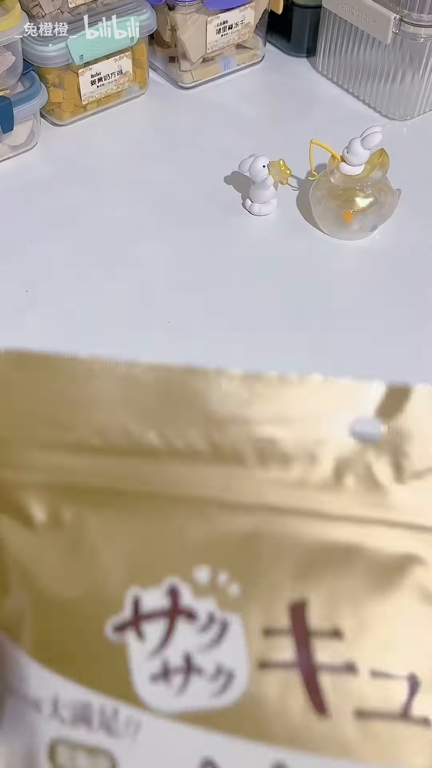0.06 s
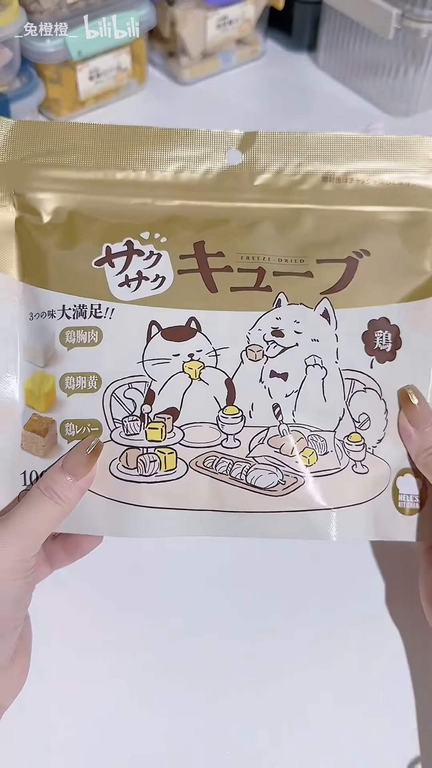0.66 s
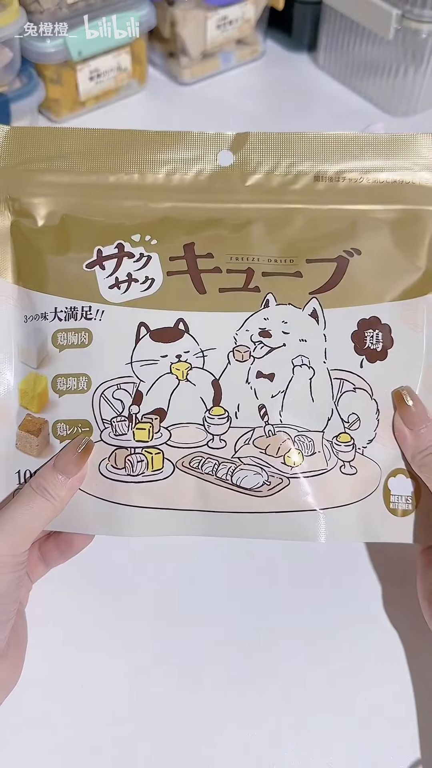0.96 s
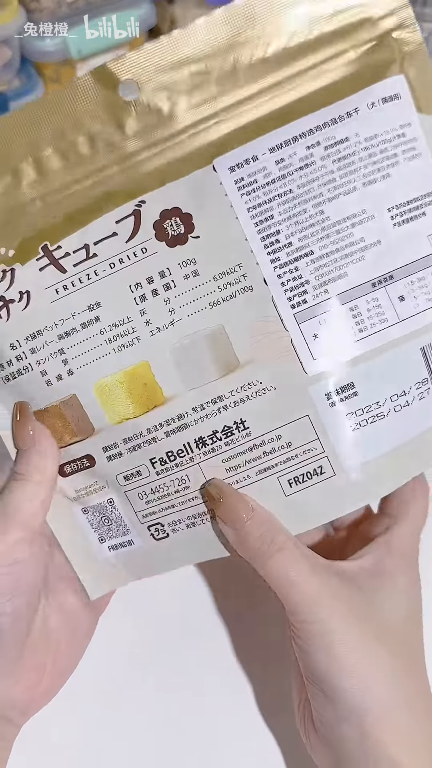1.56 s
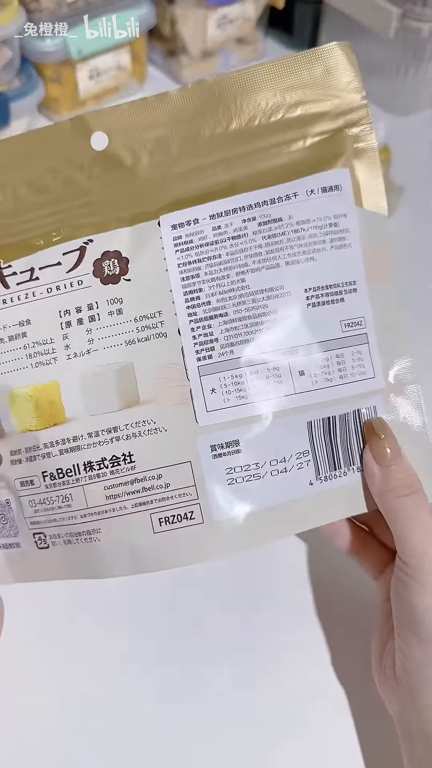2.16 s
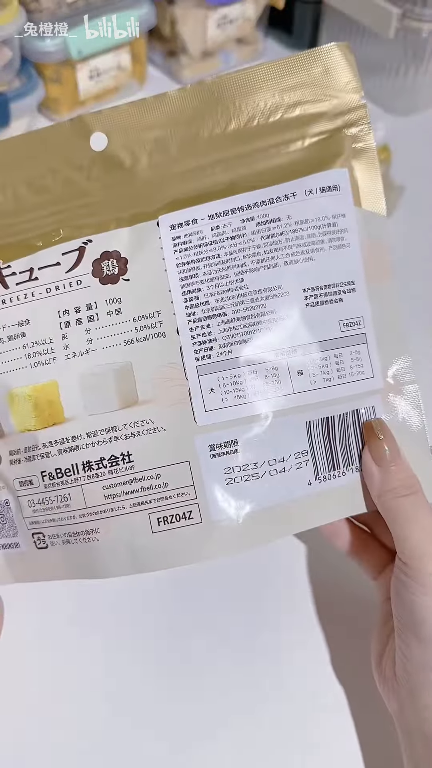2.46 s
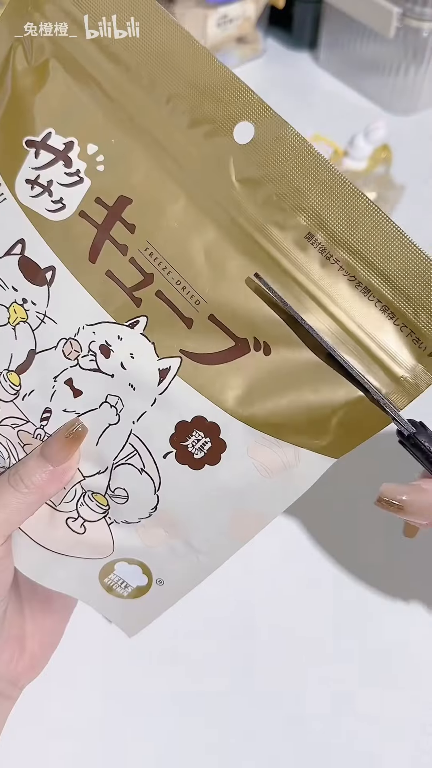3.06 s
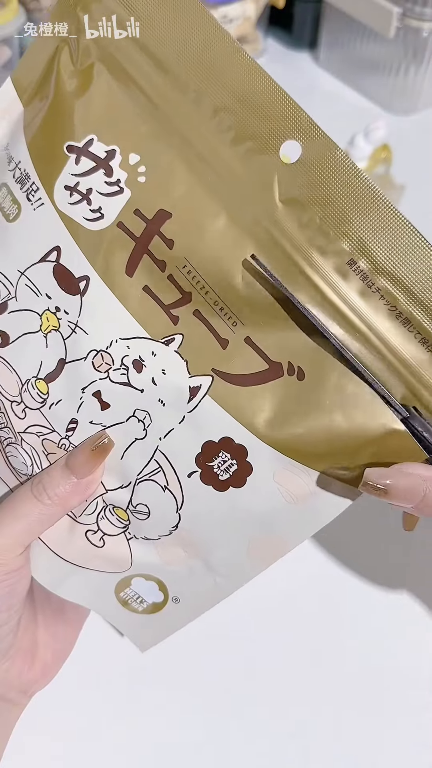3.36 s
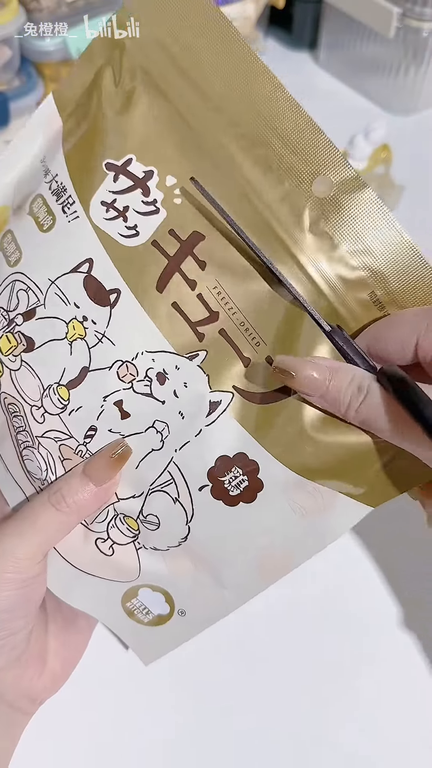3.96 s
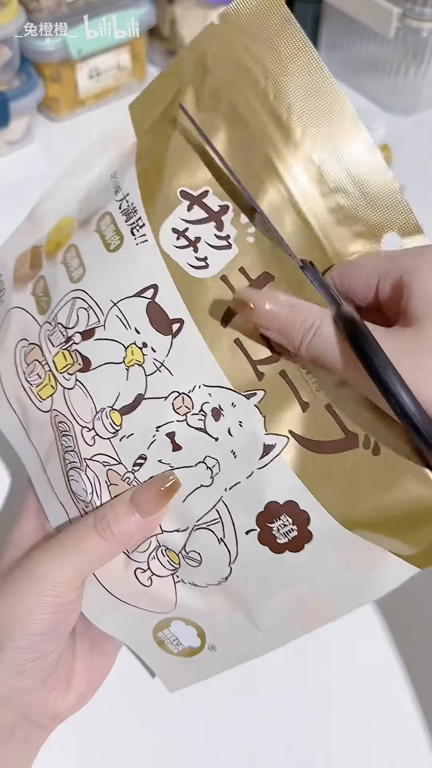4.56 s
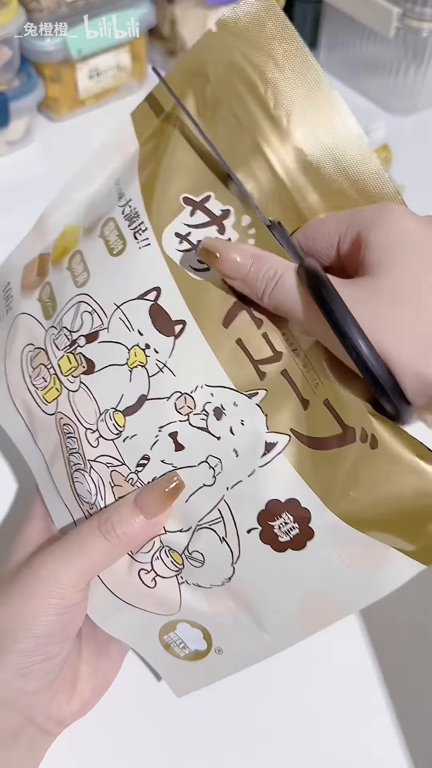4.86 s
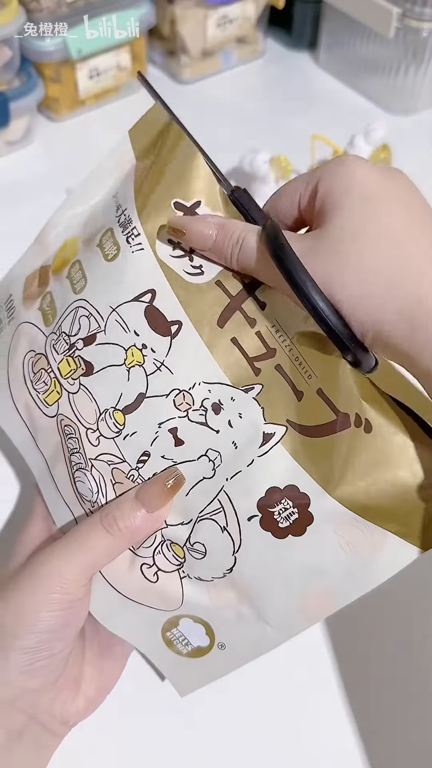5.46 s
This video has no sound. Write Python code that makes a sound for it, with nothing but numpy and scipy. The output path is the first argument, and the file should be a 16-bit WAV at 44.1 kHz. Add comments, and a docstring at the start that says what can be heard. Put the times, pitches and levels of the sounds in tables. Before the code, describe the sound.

Close crinkling and sharp crackles of a handled foil bag, followed by scissors cutting it open with a run of crisp crunches.

```python
"""Close rustling and sharp snaps, then from 2.6 s a run of crunches, about six a second.
A stiff foil pouch is lifted and turned over in a small room, then cut open with scissors.
The foil rustles as it bends, snaps as it buckles and crunches as the blades break through it.
The moving pouch pushes slow gusts of air at the microphone and drums softly when the blades jolt it."""
import sys
import numpy as np
from scipy import signal
from scipy.fft import rfft, irfft
from scipy.io import wavfile
from scipy.ndimage import uniform_filter1d, minimum_filter1d

SR = 44100
rng = np.random.default_rng(int(sys.argv[2]) if len(sys.argv) > 2 else 0)


def to_wav(s):
    """Save 16-bit WAV."""
    ch = np.atleast_2d(s).T  # columns
    pcm = np.round(np.clip(ch, -1, 1) * 32767)  # PCM
    wavfile.write(sys.argv[1], SR, pcm.astype(np.int16))


N = 247842

# The hands bend and turn the pouch. "Body" is extra bass, "sheen" extra treble, "ring" a boost at f.
# (t/s, length/s, level/dB, body/dB, sheen/dB, f/Hz, ring/dB)
GRIPS = [(0.004, 0.026, -28, -1, -8.5, 1180, -4), (0.051, 0.0097, -23, 3.5, -1, 260, 8.5),
         (0.08, .16, -35, -6.5, -2.5, 3620, 3.5), (0.285, 0.051, -31.5, -5.5, 0, 2330, 4),
         (0.369, 0.045, -36.5, 0, -3, 5500, 7), (0.455, 0.043, -30.5, 5, -0.5, 5300, 5.5),
         (0.551, 0.19, -37.5, 10, -5, 5950, 2), (1.184, .02, -20, 5, 5.5, 750, 9.5),
         (1.23, .035, -35, 9, -15, 1900, 2), (1.318, .02, -23, -7, -1, 3180, 5.5),
         (1.362, 0.036, -30, 1, -9, 407, 14), (1.391, .11, -31, -4.5, -3.5, 594, 1.5),
         (1.585, .195, -34.5, 4, 1, 1740, 3), (1.788, .084, -30, -1, -4.5, 5250, 6),
         (1.91, .1, -34, -11, -5, 5490, 5.5), (2.093, .06, -49, -10, 3, 3500, 2)]
# The blades move through the foil (t/s, length/s, rise/s, level/dB, swell/dB, body/dB, sheen/dB, f/Hz)
CUTS = [(2.593, 0.039, 0.1, -28.5, -2, 1, 1.5, 4010), (2.674, 0.071, 0.0449, -26, -10, 6, -1, 800),
        (2.844, 0.046, 0.3, -34, 11.5, 0, -3, 800), (3.05, 0.05, 0, -29, -6, 7, 2, 895),
        (3.193, 0.047, 0.08, -21, 2.5, 5, -1, 1110), (3.374, 0.07, 0.2, -27.5, 6.5, 2, -5.5, 1050),
        (3.572, 0.0303, 0.2, -37, -5, 8, -2, 900), (3.679, 0.016, 0.07, -21.5, 1, 3.5, -10.5, 1570),
        (3.741, .2, .05, -38.5, -0.5, 0.5, -4.5, 480.5), (3.994, 0.036, .06, -20.5, 1, -1.5, -3, 831),
        (4.151, 0.027, 0.08, -15, 1.5, -8, -4, 5600), (4.321, 0.059, .11, -21.5, 2.5, 3.5, -2.5, 676),
        (4.48, 0.025, .07, -19, 3, -2.5, 0.5, 2249), (4.607, 0.067, 0.12, -27, -0.5, 7.5, 0, 2440),
        (4.777, .028, 0.07, -26, 5.5, -0.5, 3.5, 692), (4.898, .06, -0.08, -26, 3.5, 5, 4, 685),
        (5.073, 0.045, .07, -27, -0.5, 6, 1, 1500), (5.225, .028, 0.18, -26, 8.5, 6.5, 2.5, 1210),
        (5.287, .03, 0.15, -21, -2, 13, 6.5, 390), (5.39, 0.069, .2, -34, 8.5, 7, 8, 1620),
        (5.502, 0.03, 0.7, -32, 6, 2.5, -2, 2070)]


def amp(db):
    """Turns decibels into a gain."""
    return 10 ** (np.asarray(db) / 20)


def unit(x):
    """Scales a signal to an average power of 1."""
    return x / np.sqrt(np.mean(x ** 2) + 1e-20)


def fade(t, t60):
    """Dies away by 60 dB every t60 seconds."""
    return np.exp(-np.log(1000) * t / t60)


def read(points, hz):
    """Looks up a table by frequency, giving each octave equal room."""
    f, value = np.transpose(points)
    return np.interp(np.log(hz + 1), np.log(f + 1), value)


def add(mix, s, sound):
    """Mixes a sound in, starting at s seconds."""
    at = round(s * SR)
    sound = sound[max(-at, 0):]
    part = mix[max(at, 0):][:len(sound)]
    part += sound[:len(part)]


def tint(x, colour):
    """Turns each frequency up or down as a table says."""
    return irfft(rfft(x) * amp(read(colour, np.fft.rfftfreq(N, 1 / SR))), N)


def stroke(s, length, rise_s, fall_s, swell_db=0):
    """Start time and force of one movement: it builds up by 60 dB, carries on and dies away."""
    rise_s = max(rise_s, .02)
    t = np.arange(-rise_s, length + fall_s, 1 / SR)
    away = np.maximum(-t, 0) / rise_s + np.maximum(t - length, 0) / fall_s
    progress = np.clip(t / length, 0, 1)
    return s - rise_s, amp(swell_db * (progress - .5) - 60 * away)


def room_noise(level_db=-42.5):
    """The steady, low hush of the room."""
    hush_colour = [(20, -34), (60, 0.5), (95, 1.5), (135, -11.5), (180, -1), (260, -11.5), (550, -12.5),
                   (1300, -20.5), (3000, -26.5), (5200, -31.5), (6200, -36), (12000, -41)]  # tone of the hush (f/Hz, level/dB)
    return amp(level_db) * unit(tint(rng.standard_normal(N), hush_colour))


def reflections(x, t60s, delay_s):
    """Sound bounces back as many small echoes, each frequency fading at its own speed."""
    echoes = rng.choice([-1., 1.], SR // 2) * (rng.random(SR // 2) < .08)
    hz, t, bands = signal.stft(echoes, SR, nperseg=256)
    tail = signal.istft(bands * fade(t, read(t60s, hz)[:, None]), SR)[1]
    tail = np.r_[np.zeros(int(delay_s * SR)), tail / np.linalg.norm(tail)]
    return signal.fftconvolve(x, tail)[:N]


def gusts(level_db=-1, held_db=-45.5, stir_db=-17.5, steady_s=.1025):
    """The pouch pushes air: a little while held, more when it swings or is cut."""
    swings = [(0.0, 0.027, -28), (0.45, 0.085, -30.5), (0.68, 0.23, -47), (1.315, .12, -16.5),
              (1.64, .12, -19.5), (1.85, 0.053, -33), (2.17, 0.16, -46), (3.755, 0.013, -26),
              (5.25, 0.031, -25)]  # swings of the pouch (t/s, length/s, level/dB)
    air_colour = [(0, -29), (3, 4), (7, 6.5), (14, 2), (23, -6), (50, -17.5), (80, -29.5), (160, -67),
                  (400, -83)]  # tone of the moving air (f/Hz, level/dB)
    stirs = [(s, length, db + stir_db) for s, length, _, db, *_ in CUTS]
    speed = np.full(N, amp(held_db))
    for s, length, db in list(swings) + stirs:
        start, push = stroke(s, length, rise_s=.088, fall_s=.36)
        add(speed, start, amp(db) * push)
    air = unit(tint(rng.standard_normal(N), air_colour))
    # Even out the part high enough to hear, so that speed sets the loudness.
    audible_power = irfft(rfft(air) * (np.fft.rfftfreq(N, 1 / SR) > 22), N) ** 2
    air /= np.sqrt(uniform_filter1d(audible_power, int(steady_s * SR)) + audible_power.mean() / 10)
    return air * amp(level_db) * speed * signal.windows.tukey(N, .01)


def drumming(hz=102, t60=.18, rise_s=.011):
    """The closing blades jolt the air-filled pouch, which answers like a soft, low drum."""
    jolts = [(2.671, -25.5), (2.886, -22.5), (3.083, -26.5), (3.198, -25), (3.415, -26), (4.351, -30),
             (4.626, -27), (4.928, -27.5), (5.283, -21)]  # knocks from the blades (t/s, peak/dB)
    out, t = np.zeros(N), np.arange(SR // 3) / SR
    for s, db in jolts:
        swell = (1 - np.exp(-(t / rise_s) ** 2)) * fade(t, t60)
        tone = np.sin(2 * np.pi * hz * rng.uniform(.9, 1.03) * t)
        add(out, s, amp(db) * swell / swell.max() * tone)
    return out


def panel(body_db, sheen_db, ring_hz, ring_db, octaves=.44, samples=4096):
    """How the pouch answers one click: a bulging body, a bright skin and one ringing panel of foil."""
    foil_colour = [(25, -11.5), (55, -1.5), (78, -6.5), (102, 1.5), (140, -5.5), (400, -6), (1200, -5.5),
                   (1650, -9.5), (3200, -10), (5300, -12.5), (5850, -17), (7200, -15), (9200, -17.5),
                   (11900, -21)]  # tone of the foil (f/Hz, level/dB)
    pouch_rings = [(800, 370, 0.77), (1343, 180, 2.5), (2030, 224, 2.5), (2735, 51, 1.5), (3560, 260, 2.5),
                   (4520, 420, 3.5), (5160, 160, 3), (8320, 730, 4.5), (9470, 104, 6.5), (10320, 170, 6.5),
                   (11140, 82, 8.5)]  # pitches where the half-filled pouch rings (f/Hz, width/Hz, boost/dB)
    hz = np.fft.rfftfreq(samples, 1 / SR)
    db = read(foil_colour, hz)
    db += read([(250, body_db), (1500, .011)], hz) + read([(2000, 0), (9000, sheen_db)], hz)
    db += sum(boost * np.exp(-((hz - f) / width) ** 2) for f, width, boost in pouch_rings)
    db += ring_db * np.exp(-(np.log2((hz + 1) / ring_hz) / octaves) ** 2)
    db += read([(11900, 0), (12900, -14), (SR / 2, -50)], hz)
    # Turn this tone curve into a sound that starts sharply and rings afterwards.
    log_gain = np.log(amp(np.r_[db, db[-2:0:-1]]))
    spectrum = np.exp(np.conj(signal.hilbert(log_gain)))
    response = np.fft.ifft(spectrum).real[:samples // 2]
    return response / np.linalg.norm(response)


def crackle(force, per_s, rub, clump_db, usual_db=-28, spread_db=3, clump_s=.011):
    """Tiny cracks of uneven size come in clumps over a smooth rub; more force sets off more of them."""
    chance, size, sign = rng.random(len(force)), rng.exponential(1, len(force)), rng.choice([-1, 1], len(force))
    hiss, wobble = rng.standard_normal((2, len(force)))
    odds = per_s / SR * np.clip(force / amp(usual_db), .5, 4)
    cracks = (chance < odds) * sign * amp(spread_db * np.minimum(size, 4)) / np.sqrt(odds)
    clumps = unit(signal.fftconvolve(wobble, np.hanning(int(clump_s * SR) + 3), "same"))
    texture = unit(cracks) + rub * hiss
    return force * unit(texture * amp(clump_db * np.clip(clumps, -2, 2)))


def flex(x, patchy_db=3.5):
    """As the foil bends, its small faces start and stop ringing, so patches of the sound flicker."""
    bands = signal.stft(x, nperseg=256)[2]
    patch = np.outer(np.hanning(5), np.hanning(28))  # about 300 Hz wide and 40 ms long
    flicker = unit(signal.fftconvolve(rng.standard_normal(bands.shape), patch, "same"))
    bands = bands * amp(patchy_db * np.clip(flicker, -2, 2))
    return np.std(x) * unit(signal.istft(bands)[1][:N])


def snap(t60, colour, burst_s=.00082, burst=1.2, scatter=.81, samples=4096):
    """A crease flips with a click and a short burst; a ripple then scatters round the pouch."""
    t = np.arange(samples) / SR
    flip, ripple = rng.standard_normal((2, samples))
    click = unit(1. * (t == 0))
    push = unit(click + burst * unit(flip * t * np.exp(-2 * t / burst_s)))
    push += scatter * unit(ripple * fade(t, t60))
    sound = signal.fftconvolve(push, panel(*colour, octaves=.45))
    return sound / np.linalg.norm(sound)


def snaps(rows, t60):
    """Plays one snap for each row of a table."""
    out = np.zeros(N)
    for s, db, *colour in rows:
        add(out, s, amp(db) * snap(t60, colour))
    return out


def crinkles(per_s=16, over_db=24, spread_db=2.5, late_s=.01, low_hz=700, high_hz=4000):
    """Small creases give way at random during and just after each movement, louder if it is harder."""
    out = np.zeros(N)
    moves = [row[:3] for row in GRIPS] + [(s, length, db) for s, length, _, db, *_ in CUTS]
    for s, length, db in moves:
        span = length + late_s
        count = int(per_s * span + rng.random())
        for when, size, pitch in rng.random((count, 3)):
            ring_hz = low_hz * (high_hz / low_hz) ** pitch
            gain = amp(db + over_db + spread_db * (2 * size - 1))
            add(out, s + when * span, gain * snap(t60=.022, colour=(3, -3, ring_hz, 10)))
    return out


def handling():
    """The foil rustles under each change of grip."""
    out = np.zeros(N)
    for s, length, db, *colour in GRIPS:
        start, force = stroke(s, length, rise_s=.115, fall_s=.2)
        cracks = crackle(amp(db) * force, per_s=3200, rub=.8, clump_db=2.5)
        add(out, start, signal.fftconvolve(cracks, panel(*colour)))
    return flex(out)


def buckling():
    """Stiff panels of the pouch give way with sharp snaps."""
    buckles = [(0.0304, -1, -9, -10, 1090, 14), (0.0573, 5, 4, -4, 1280, 15),
               (0.311, 7.5, -12, -7, 2540, 7), (0.3255, 1, -3, -15, 910, 7), (0.3879, -3, -2, -8, 1060, 18),
               (0.4172, 2, -15, -17, 2330, 3), (0.4515, 9, -7, -10, 1300, 7),
               (0.4624, 5.5, -13, -6, 1190, 2), (0.4797, 4.5, -15, -5, 954, 6),
               (0.5543, -1.5, 6.5, -10, 1040, 5), (0.6301, .7, -3, -17, 3920, 3.5),
               (0.663, -1, 6, -18, 910, 3), (0.724, 9, -9, -7.5, 2370, 8.5),
               (0.9312, -13, 6.5, -16, 1170, 2), (1.1473, -4.5, 8, 1, 1070, 13), (1.179, 6, 7, 7, 830, 11),
               (1.2408, -0.5, -3, -21, 1280, 14), (1.2613, 5.5, -6, -8, 1400, 20),
               (1.3569, 14, -13, 1, 2930, 0), (1.3947, 5.5, 9.5, -16, 3000, 8),
               (1.4574, 10, -8, 0, 1720, 10.5), (1.4897, 7, 2, -2.5, 5400, 10.5),
               (1.672, 2.5, 0, 19.5, 1720, 15.5), (1.803, 10, -20, -0.5, 3120, 7.5),
               (1.8252, 8, -10, -6, 4760, 14), (1.8637, 8, -10.5, -8, 4000, 4), (1.916, -3, -4, 0, 604, 12),
               (1.9491, 7, -9, -2.5, 5140, 8), (1.9602, 7.5, -1.5, -11.5, 1160, 8),
               (1.9676, 10, 1, 2, 3040, 19), (1.9796, 0, -30, -20, 5030, 18), (2.021, -8, -7, 8, 3470, 12),
               (2.0605, 2.4, -16, -9.5, 1480, 9), (2.343, -23, 4, 10, 800, -1),
               (3.5503, -5, 8, 1, 1111, 20), (3.6177, -5, 17, -17, 1260, 15.5),
               (3.855, -2, -2, -2, 1020, 25), (4.1033, -4, 9, -1, 947, 13), (4.6572, 6.5, 7, .5, 1270, 13)]  # a panel gives way (t/s, energy/dB, body/dB, sheen/dB, f/Hz, ring/dB)
    return snaps(buckles, t60=.032)


def biting():
    """The blades bite through a seam or click together."""
    bites = [(2.5088, -11, 7.5, 15.5, 1670, 13), (2.731, 1, 12, -1, 995, 2),
             (2.7488, 9.5, -6, -13.5, 715, 5.5), (2.8853, 4, 21, -8, 1480, 7),
             (2.9009, 3, -2, -19, 4160, 6), (2.9662, -18, 15, 12, 5000, 14), (3.0482, -3, 8, 9, 3350, 7),
             (3.0824, 1, 9, 4, 800, 2), (3.0983, 12.5, 10, 8.5, 784, 18), (3.198, 11, -4, -6, 4904, 7.5),
             (3.3717, -5, -7, 10, 3500, 1), (3.4418, 7.5, -6.5, -31, 1560, 1),
             (3.4512, 8.5, 1, -18, 2380, 10.5), (3.4843, -10, -2, 28.5, 2130, 14),
             (3.5695, 3, 9, 17, 1480, 6), (3.582, 5, -14, -7, 2680, 3), (3.6891, 3.5, 1, 4, 2500, 10),
             (3.8689, 12, 1, -8.5, 4600, 6.5), (3.945, -3.5, -2, 1, 787, 13), (3.9783, 1.5, 2, 5, 1480, 13),
             (3.9992, 9, -11, -12, 3800, 2), (4.037, 9, -2.5, -2, 3450, 6),
             (4.0968, -0.5, -1, 0.5, 2800, 8), (4.314, 4, 2, -3, 631, 5), (4.382, 16.5, 3, -2, 1110, 8),
             (4.505, 10, 0, 4, 2300, -3), (4.5138, 16, -18, -13, 3230, 5), (4.525, 8, -9, 5, 2766, 6),
             (4.6007, 3, 3, 5, 2560, 8), (4.8072, 4.5, -2.5, 18, 4100, 8), (4.8184, 10.5, -5, 15, 4697, 9),
             (4.8995, -0.5, -16, -20, 630, -1), (5.1691, 1.7, 5, -5, 1974, 8),
             (5.2315, 5, 7, 12.5, 710, 14), (5.301, 9, 3.5, -7, 600, -3), (5.3207, 19, 2.5, 5, 2100, 6.5),
             (5.391, 4, -8, 0, 1380, 10), (5.4233, 0.5, -1, 4, 2810, 8), (5.4407, 5.5, -1, 2.5, 4730, 4),
             (5.4976, -3.5, 2, -18, 1380, 0)]  # snaps of the blades (t/s, energy/dB, body/dB, sheen/dB, f/Hz, ring/dB)
    return snaps(bites, t60=.031)


def cutting(ring_db=4):
    """Each stroke of the blades parts the foil in a run of tiny cracks, and the cut panel rings."""
    out = np.zeros(N)
    for s, length, rise_s, db, swell_db, *colour in CUTS:
        start, force = stroke(s, length, rise_s, fall_s=.135, swell_db=swell_db)
        cracks = crackle(amp(db) * force, per_s=2400, rub=.58, clump_db=1.93)
        add(out, start, signal.fftconvolve(cracks, panel(*colour, ring_db)))
    return flex(out)


def scene(room_db=-16):
    """The pouch sounds in the middle; above about 4 kHz the treble also has some width between the two
    channels."""
    room_decay = [(100, 0.6), (500, 0.039), (1500, 0.082), (4000, 0.12), (10000, 0.18)]  # how long the room rings (f/Hz, time to fade by 60 dB/s)
    stereo_width = [(60, -78), (600, -66), (1500, -55), (3800, -55), (4200, -14), (8000, -14.5),
                    (12000, -12)]  # sound at the sides against the middle (f/Hz, level/dB)
    air = gusts()
    low = drumming() + room_noise()
    foil = buckling() + biting() + handling() + cutting() + crinkles()
    mid = foil + amp(room_db) * reflections(foil, room_decay, delay_s=.004) + low
    scattered = reflections(mid, [(100, .0033), (12000, .0033)], delay_s=.0004)
    side = tint(scattered, stereo_width)
    return mid + air + np.array([side, -side])


def record(dry, ceiling=.97, edge_hz=12800):
    """A fast limiter turns down the sharpest snaps; then a filter removes the highest treble."""
    needed_gain = np.minimum(1, ceiling / (abs(dry).max(0) + 1e-9))
    smooth_gain = uniform_filter1d(minimum_filter1d(needed_gain, size=25), size=25)
    lowpass = signal.firwin(161, edge_hz, window=("kaiser", 7), fs=SR)
    return signal.oaconvolve(dry * smooth_gain, lowpass[None], "same", axes=1)


dry = scene()
out = record(dry)
to_wav(out)
```